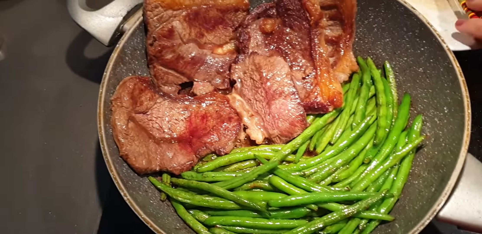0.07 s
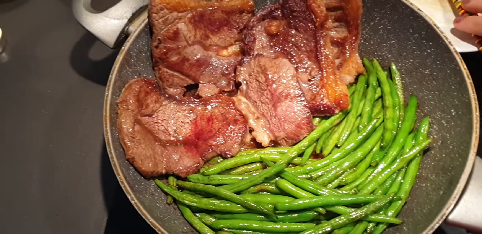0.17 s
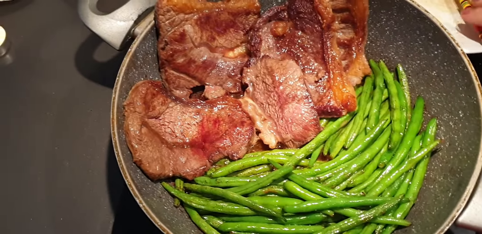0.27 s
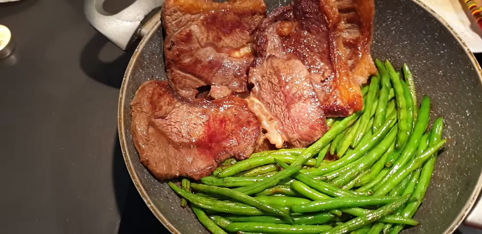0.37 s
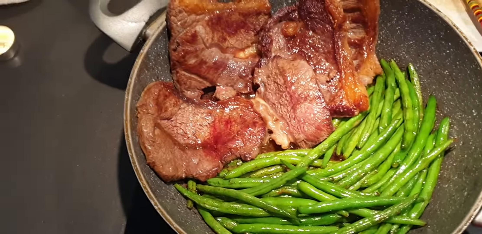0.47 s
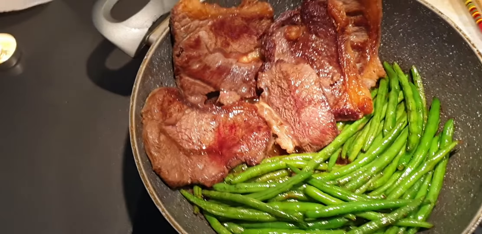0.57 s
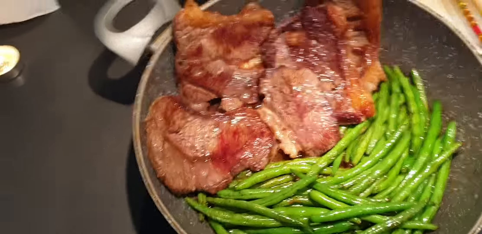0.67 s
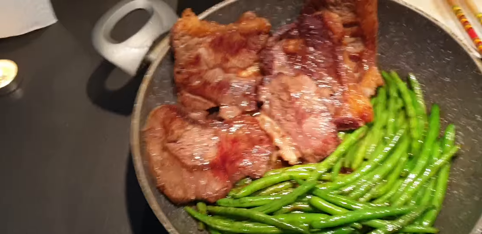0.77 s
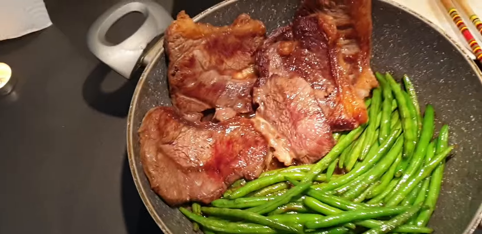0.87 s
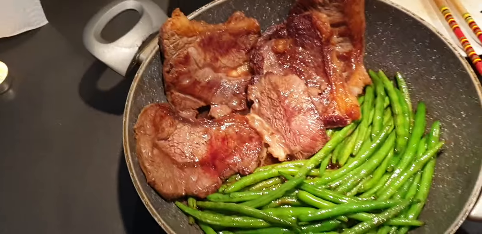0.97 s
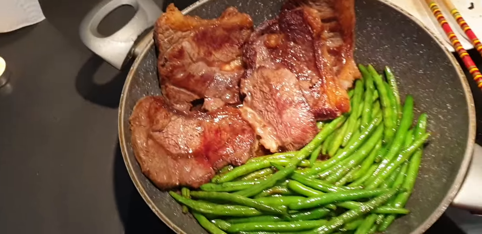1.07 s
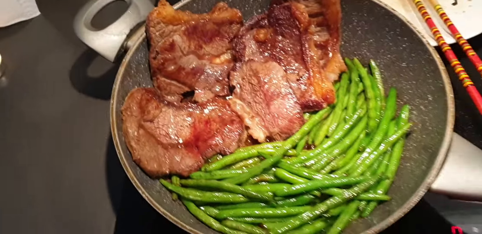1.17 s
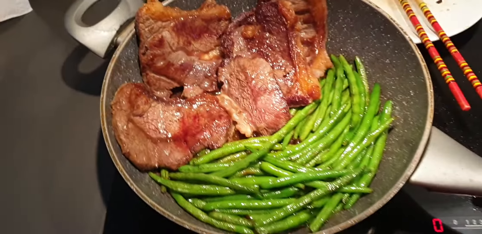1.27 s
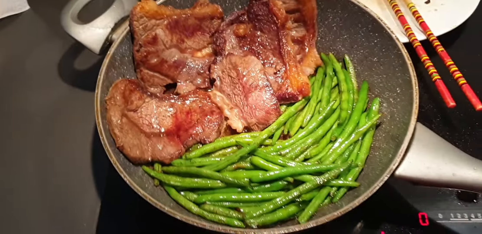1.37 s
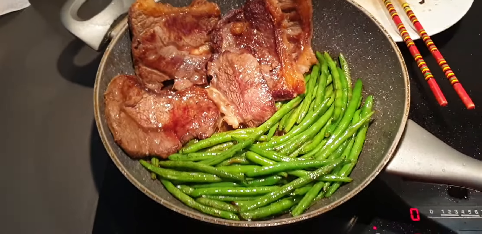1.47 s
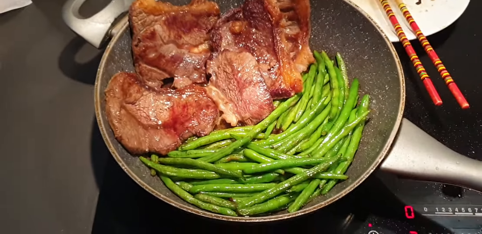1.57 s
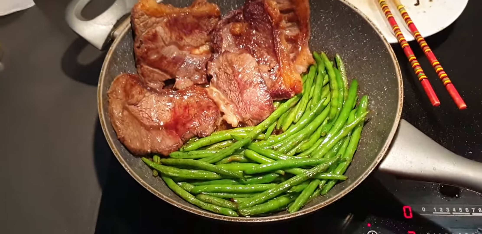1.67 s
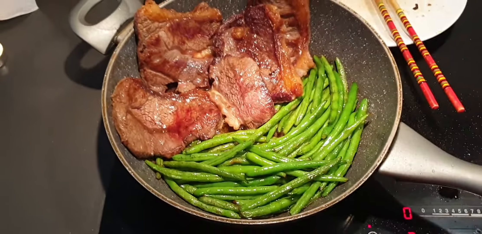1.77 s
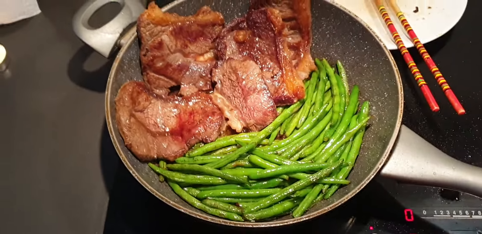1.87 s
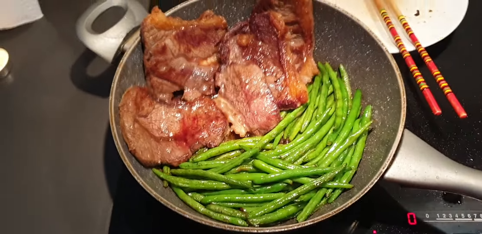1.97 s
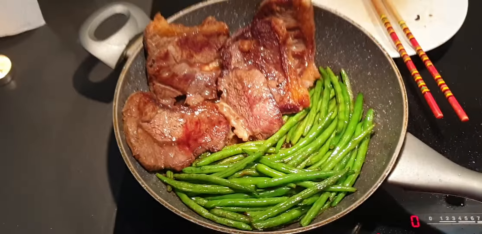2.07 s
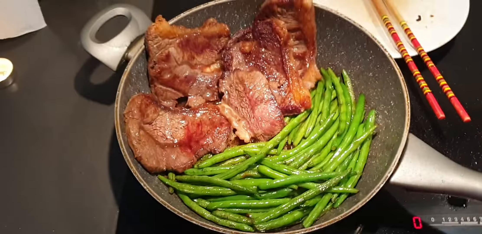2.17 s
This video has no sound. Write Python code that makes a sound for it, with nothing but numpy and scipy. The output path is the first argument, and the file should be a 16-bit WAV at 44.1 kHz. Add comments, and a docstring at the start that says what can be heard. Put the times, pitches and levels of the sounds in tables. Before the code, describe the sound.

Soft knock, then a hard ceramic clack with short bright ring and dull worktop thud, close and left of centre; a small room echoes briefly, leaving quiet sizzling, a small tick, thin steam squeaks and low rumble.

```python
"""A small kitchen, heard from close by and louder on the left, with a low rumble and a faint whirr of shaped noise.
A pan of steak and beans barely sizzles: noise hiss, random pops and a few swept tones, probably squeaks of steam.
Beside it a china plate is set down: noise clacks and ticks, ringing china modes and thumping worktop modes.
Small taps are bursts of banded noise, soft rustles are swells of noise, and decaying noise gives the room echo.
"""
import sys
import numpy as np
from scipy import signal
from scipy.fft import rfft, irfft
from scipy.io import wavfile

SR = 44100
rng = np.random.default_rng(int(sys.argv[2]) if len(sys.argv) > 2 else 0)


def persist_wave(psi):
    """Save psi, clipped to +-1, as 16-bit WAV."""
    counts = np.round(np.clip(psi, -1, 1) * 32767).astype(np.int16)
    wavfile.write(sys.argv[1], SR, np.atleast_2d(counts).T)


N = 97020  # samples, 2.2 s

# In every table and setting, a positive left-right level favours the left.
# rumble spectrum [f/Hz, level/dB]
RUMBLE_COLOUR = [(20, -32.5), (38, -11.5), (58, 6), (85, -6), (118, 4), (150, -6.5), (220, -13.5),
                 (400, -19), (900, -25), (2000, -29.5)]
# swell of the rumble [t/s, level/dB]
RUMBLE_SWELL = [(0, -57.5), (0.3, -52.5), (0.47, -54.5), (0.7, -58), (1.15, -59), (1.35, -61.5),
                (1.7, -61.5), (1.9, -67), (2.0, -60.5), (2.2, -59.5)]
# swell of the faint whirr [t/s, level/dB]
WHIRR_SWELL = [(0, -62.5), (0.7, -64), (1.151, -68.5), (1.4, -84), (2.2, -67.5)]
# sizzle spectrum [f/Hz, level/dB]
SIZZLE_COLOUR = [(290, -21), (500, -22), (570, -19.5), (1210, -2.5), (1950, -9.5), (3390, -6), (3920, -7),
                 (6700, -11.5), (7530, -11), (12900, -11.5), (16000, -39.5)]
# left-right balance of sizzle and whirr [f/Hz, left-right level/dB]
SIZZLE_BALANCE = [(600, 29.5), (1300, 6.5), (2400, 12.5), (4400, 10.5), (8000, 1.5), (16000, 2)]
# hiss level, and a balance shift of the whole sizzle [t/s, level/dB, left-right shift/dB]
SIZZLE_MOTION = [(0, -61, 1.5), (0.65, -62.5, 1.5), (1.1, -61, 1.5), (1.5, -62, 1), (1.9, -61, 2),
                 (2.2, -65, 4)]
# recorder's gain on the top treble of the sizzle [t/s, level/dB]
RECORDER_TREBLE = [(0, -3), (0.25, -14), (0.5, -16), (0.8, -14), (1.15, -9), (1.5, 2.5), (1.95, -1),
                   (2.2, -6)]
# light taps [t/s, level/dB, centre f/Hz, width/octaves, decay t60/s, left-right level/dB]
TAP_BURSTS = [(0.0921, -45.5, 1140, 0.72, 0.056, 12), (0.093, -52.5, 6800, 0.95, 0.054, 3),
              (0.092, -46.5, 151, 0.65, 0.16, 5.5), (0.121, -52, 1086, 0.39, 0.12, 9),
              (0.144, -44, 133, 0.36, 0.33, 3), (0.845, -57, 8500, 0.27, .015, 7),
              (1.146, -46, 12500, 0.25, .025, 7), (1.1468, -54.5, 2150, 2.3, 0.085, 13),
              (1.195, -52, 307, 0.52, 0.18, 7)]
# soft rustles [middle t/s, spread/s, level/dB]
RUSTLE_SWELLS = [(0.139, .055, -58), (1.788, 0.03, -55), (1.917, 0.052, -55.5)]
# rustle spectrum [f/Hz, level/dB]
RUSTLE_COLOUR = [(400, -18), (1300, -3), (3300, -4), (6000, -7.5), (11000, -10), (16000, -19)]
# contacts of the plate [t/s, ring level/dB, clack level/dB, tick level/dB, thump level/dB]
PLATE_CONTACTS = [(0.2436, -1, 1, 4, -1), (0.2596, -12.5, -7.5, -10, -5), (0.2680, -26, -15.5, -32, 0),
                  (0.2734, -15, -7, 0.5, -0.5), (0.2977, -55, -18, -12, -26)]
# ringing modes of the china, main rings first [f/Hz, level/dB, decay t60/s, left-right level/dB]
CHINA_MODES = [(967, -26, .1, 5), (1941, -23, .1, 14), (2748, -23, .125, 14), (3571, -23.5, .145, 14),
               (4422, -28, .2, 1), (1744, -38, .26, 9), (1807, -35, .16, 9), (2712, -28, .04, 14),
               (3535, -25, .04, 14), (3638, -31, .11, 12), (4357, -27.5, .09, 0), (4794, -37, .17, 6),
               (5290, -26, .035, 2), (5370, -25, .05, 3)]
# thumping modes of the worktop [f/Hz, level/dB, decay t60/s]
WORKTOP_MODES = [(66.8, -31.5, 0.099), (133, -32.5, 0.54), (163.9, -35.5, 0.13), (207, -45.5, 0.52),
                 (274, -42, .25), (306.9, -42.5, .25), (462, -52.5, .3), (526, -63, .15)]
# clack spectrum [f/Hz, level/dB]
CLACK_COLOUR = [(90, -11), (200, -7.5), (450, -12), (780, -13), (970, 1), (1200, -3), (1500, 1), (2400, -7),
                (2800, 1), (3150, -9.5), (3600, -12.5), (4000, -6.5), (4450, 5.5), (4950, -11.5), (5400, 4),
                (5950, -19), (6600, -2.5), (7600, -9), (10000, -17), (16000, -33)]
# clack balance [f/Hz, left-right level/dB]
CLACK_BALANCE = [(200, 7.7), (1400, 1.3), (2400, 13.2), (3500, 22), (4500, 1.3), (8000, 1), (16000, 1)]
# sharp tick spectrum [f/Hz, level/dB]
TICK_COLOUR = [(2000, -14), (6000, -12), (8500, -14.5), (10400, -6.5), (13000, -19.5), (16000, -24)]
# thin squeaks [t/s, length/s, start f/Hz, middle f/Hz, end f/Hz, level/dB, second harmonic level/dB]
SQUEAK_GLIDES = [(1.261, 0.02, 3560, 3560, 3450, -63, -8), (0.614, 0.0167, 4000, 3740, 3370, -64, -12),
                 (1.349, 0.029, 4060, 3820, 3560, -65.5, -6), (1.454, 0.09, 3145, 3374, 3355, -64.5, 0.5),
                 (1.530, 0.021, 3380, 3150, 2900, -68, 1.5), (1.594, .06, 3500, 3454, 3200, -65.5, 0.5),
                 (1.681, .018, 3490, 3210, 3100, -66.5, -7), (1.883, 0.026, 4000, 3500, 2980, -60.5, -12)]
# bands of the kitchen's echo [f/Hz, level/dB, decay t60/s]
ECHO_BANDS = [(126, -24, 0.9), (258, -6, 0.74), (500, 1, 0.46), (1000, -2.5, 0.4), (2070, -7.5, 0.57),
              (4000, -8, 0.55), (7900, -8.5, .4), (14000, -5.5, .28)]

RUMBLE_PAN_DB, RUMBLE_APART = 6.5, .3  # RUMBLE_APART: gain of the part unrelated between the sides
WHIRR_HZ, WHIRR_OCTAVES = 1335, 0.32
POPS_PER_S, POPS_DB, POP_SCATTER_DB = 500, -71.5, 5  # scatter: mean excess of one pop, before its cap
POP_HZ, POP_OCTAVES = 8200, 0.94
TREBLE_ABOVE_HZ = 11700
RUSTLE_PAN_DB = 6.5
CLACK_DB, CLACK_T60_S, CLACK_RISE_S = -14, 0.047, .0008
TICK_DB, TICK_T60_S = -25, 0.033
PLATE_RISE_S = 0.001
RING_WAVER_HZ, RING_WAVER_RATE_HZ = 5, 30  # rms pitch wander, and the centre of its band
WORKTOP_PAN_DB, WORKTOP_RISE_S = 3.5, 0.0018
SQUEAK_WAVER, SQUEAK_FLUTTER_DB = .013, 3  # rms pitch fraction, rms level
SQUEAK_THIRD_DB, SQUEAK_PAN_DB = -8, 11  # third harmonic against the second
ROOM_RISE_S, ROOM_PAN_DB = 0.0063, 5.5
ALIKE_BELOW_HZ = 1700  # the sides grow less alike up to here, unrelated above
LOW_CUT_HZ, TOP_HZ = 30.5, 15800


def undb(db):
    """Decibels to gain."""
    return 10 ** (np.asarray(db) / 20)


def unit(x):
    """Scale to rms 1."""
    return x / np.sqrt(np.mean(x ** 2))


def pan(db):
    """Left and right gains for a level difference."""
    return undb(np.array([[.5], [-.5]]) * db)


def since(start):
    """Seconds since a moment, zero before it."""
    return np.maximum(np.arange(N) / SR - start, 0)


def over_time(points):
    """Breakpoints of time and level joined by straight lines."""
    times, values = np.array(points).T
    return np.interp(since(0), times, values)


def octaves():
    """The frequency axis in octaves above 1 Hz."""
    return np.log2(np.maximum(np.fft.rfftfreq(N, 1 / SR), 1))


def curve(points):
    """Breakpoints of frequency and level joined along the octave axis."""
    hz, db = np.array(points, float).T
    return np.interp(octaves(), np.log2(hz), db)


def bell(hz, width):
    """A smooth band, its standard deviation in octaves."""
    return np.exp(-.5 * ((octaves() - np.log2(hz)) / width) ** 2)


def shape(x, gain):
    """Filter by a gain for each frequency."""
    return irfft(rfft(x) * gain, N)


def colour(x, gain):
    """Filter by a gain for each frequency, to rms 1."""
    return unit(shape(x, gain))


def diffuse():
    """White noise at two close microphones: alike in the bass, unrelated in the treble."""
    apart = np.minimum(np.fft.rfftfreq(N, 1 / SR) / ALIKE_BELOW_HZ, 1)
    own = rfft(rng.standard_normal((2, N)))
    common = rfft(rng.standard_normal(N))
    return irfft(apart * own + np.sqrt(1 - apart ** 2) * common, N)


def noise(gain, channels=2):
    """Coloured noise, mono or stereo, at rms 1."""
    white = diffuse() if channels == 2 else rng.standard_normal((1, N))
    return colour(white, gain)


def decay(start, t60, rise=1 / SR):
    """A quick rise and an exponential fall, followed for two decay times."""
    out = np.zeros(N)
    at = np.arange(int(start * SR) + 1, min(int((start + 2 * t60) * SR), N))
    t = at / SR - start
    out[at] = (1 - np.exp(-t / rise)) * np.exp(-np.log(1000) * t / t60)
    return out


def ring(blows, hz, t60, rise):
    """A mode gains energy from each blow and rings it away exponentially; its pitch may waver."""
    energy = sum((undb(db) * decay(start, t60, rise)) ** 2 for start, db in blows)
    sounding_hz = hz * (since(blows[0][0]) > 0)
    return np.sqrt(energy) * np.sin(2 * np.pi * np.cumsum(sounding_hz) / SR)


def background():
    """Low kitchen rumble and a faint whirr, perhaps the hob's fan, both swelling bands of noise."""
    gain = undb(curve(RUMBLE_COLOUR))
    body = noise(gain)
    unrelated = colour(rng.standard_normal((2, N)), gain)
    rumble = pan(RUMBLE_PAN_DB) * (body + RUMBLE_APART * unrelated)
    whirr = noise(bell(WHIRR_HZ, WHIRR_OCTAVES) * pan(curve(SIZZLE_BALANCE)))
    return undb(over_time(RUMBLE_SWELL)) * rumble + undb(over_time(WHIRR_SWELL)) * whirr


def sizzle():
    """Butter hisses faintly as tiny bubbles burst in random clicks.

    The recorder, perhaps by noise suppression, dulls the top treble for a while."""
    times, hiss_db, shift_db = np.array(SIZZLE_MOTION).T
    sides = pan(curve(SIZZLE_BALANCE))
    hiss = undb(np.interp(since(0), times, hiss_db)) * noise(undb(curve(SIZZLE_COLOUR)) * sides)
    bursting = rng.random(N) < POPS_PER_S / SR
    pop_sizes = undb(POP_SCATTER_DB * np.minimum(rng.exponential(size=N), 4))  # cap the loudest
    pops = undb(POPS_DB) * colour(bursting * pop_sizes, bell(POP_HZ, POP_OCTAVES) * sides)
    out = hiss + pops
    # a steep crossover, a tenth of an octave wide
    treble_band = np.clip(.5 + 10 * (octaves() - np.log2(TREBLE_ABOVE_HZ)), 0, 1)
    treble = shape(out, treble_band)
    out += treble * (undb(over_time(RECORDER_TREBLE)) - 1)
    return out * pan(np.interp(since(0), times, shift_db))


def taps():
    """Light handling knocks and ticks, each a decaying noise burst in one band."""
    out = np.zeros((2, N))
    for start, db, hz, width, t60, pan_db in TAP_BURSTS:
        band = bell(hz, width)
        burst = noise(band, channels=1) * decay(start, t60)
        rounded = shape(burst, np.sqrt(band))  # keeps the sharp onset within the band
        out += undb(db) * pan(pan_db) * rounded
    return out


def rustle():
    """Soft brushing: broad noise under smooth bell-shaped swells."""
    swell = np.zeros(N)
    for middle, spread, db in RUSTLE_SWELLS:
        swell += undb(db) * np.exp(-.5 * ((since(0) - middle) / spread) ** 2)
    return swell * noise(undb(curve(RUSTLE_COLOUR)) * pan(RUSTLE_PAN_DB))


def plate():
    """The plate lands and rocks: each contact ticks, clacks, rings the china and thumps the worktop."""
    out = np.zeros((2, N))
    clack = noise(undb(curve(CLACK_COLOUR)) * pan(curve(CLACK_BALANCE)))
    tick = noise(undb(curve(TICK_COLOUR)))
    for start, _, clack_db, tick_db, _ in PLATE_CONTACTS:
        out += clack * undb(CLACK_DB + clack_db) * decay(start, CLACK_T60_S, CLACK_RISE_S)
        out += tick * undb(TICK_DB + tick_db) * decay(start, TICK_T60_S)

    contacts = np.array(PLATE_CONTACTS)
    ring_blows, thump_blows = contacts[:, [0, 1]], contacts[:, [0, 4]]
    for hz, db, t60, pan_db in CHINA_MODES:
        waver_hz = RING_WAVER_HZ * noise(bell(RING_WAVER_RATE_HZ, 0.87), channels=1)[0]
        out += undb(db) * pan(pan_db) * ring(ring_blows, hz + waver_hz, t60, PLATE_RISE_S)
    for hz, db, t60 in WORKTOP_MODES:
        out += undb(db) * pan(WORKTOP_PAN_DB) * ring(thump_blows, hz, t60, WORKTOP_RISE_S)
    return out


def squeaks():
    """Thin whistles, probably steam: three harmonics on a curved glide, wavering in pitch and level."""
    out = np.zeros(N)
    waver = noise(bell(99, 1), channels=1)[0]
    for start, length, first_hz, middle_hz, last_hz, db, second_db in SQUEAK_GLIDES:
        progress = np.minimum(since(start) / length, 1)
        glide = np.polyfit([0, .5, 1], [first_hz, middle_hz, last_hz], 2)
        hz = np.polyval(glide, progress) * (1 + SQUEAK_WAVER * waver)
        phase = 2 * np.pi * np.cumsum(hz) / SR
        upper = np.sin(2 * phase) + undb(SQUEAK_THIRD_DB) * np.sin(3 * phase)
        tone = np.sin(phase) + undb(second_db) * upper
        out += undb(db) * np.sqrt(np.abs(np.sin(np.pi * progress))) * tone
    flutter = undb(SQUEAK_FLUTTER_DB * noise(bell(63, 1), channels=1))
    return out * flutter * pan(SQUEAK_PAN_DB)


def kitchen(x):
    """The room answers with diffuse noise, each band of the echo dying at its own rate."""
    white = rfft(diffuse())
    centres = np.log2([row[0] for row in ECHO_BANDS])
    response = np.zeros((2, N))
    for share, (_, db, t60) in zip(np.eye(len(ECHO_BANDS)), ECHO_BANDS):
        band = irfft(white * np.interp(octaves(), centres, share), N)  # crossfades into its neighbours
        fall = decay(0, t60, ROOM_RISE_S)
        response += undb(db) * band * fall / np.linalg.norm(fall)
    mono = x.mean(axis=0, keepdims=True)
    return signal.fftconvolve(mono, response, axes=1)[:, :N] * pan(ROOM_PAN_DB)


def scene():
    """Plate, taps and squeaks excite the room echo; rustle, sizzle and background are added without it."""
    near = plate() + taps() + squeaks()
    return near + kitchen(near) + rustle() + sizzle() + background()


def record(dry):
    """The recorder cuts the deepest bass gently and the top treble steeply."""
    low_cut = signal.butter(2, LOW_CUT_HZ, "high", fs=SR, output="sos")
    top_cut = signal.ellip(10, .2, 80, TOP_HZ, fs=SR, output="sos")
    return signal.sosfilt(top_cut, signal.sosfilt(low_cut, dry))


dry = scene()
out = record(dry)
persist_wave(out)
```